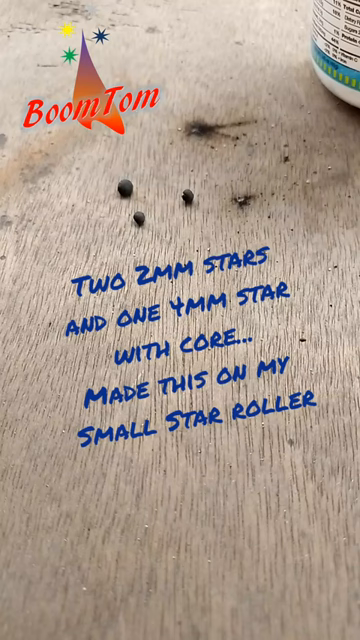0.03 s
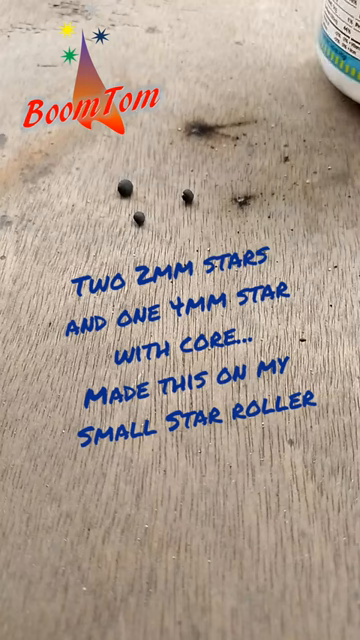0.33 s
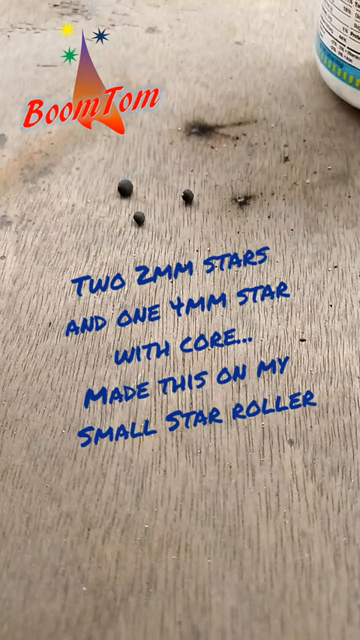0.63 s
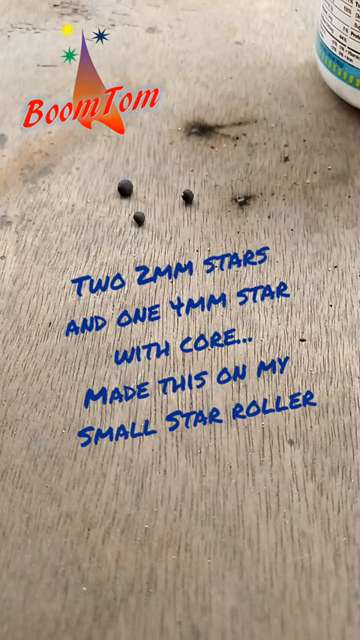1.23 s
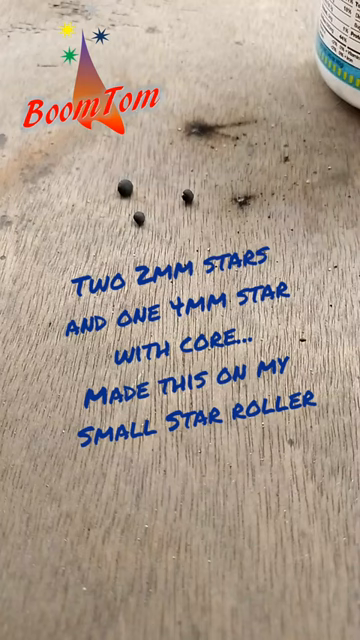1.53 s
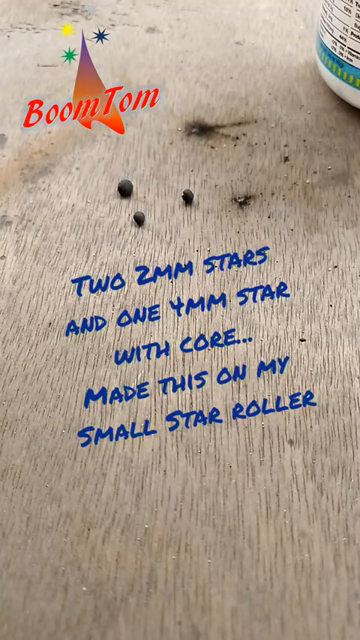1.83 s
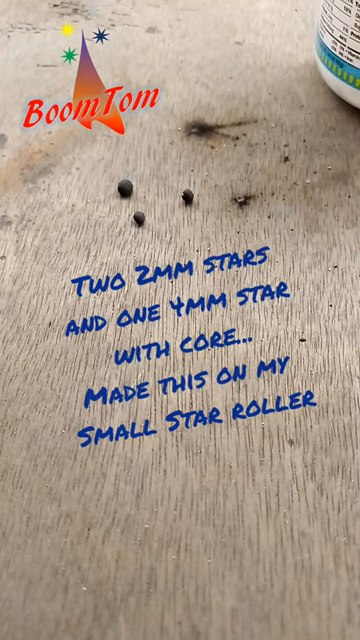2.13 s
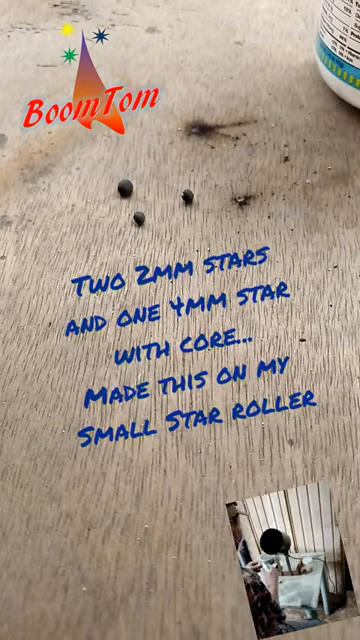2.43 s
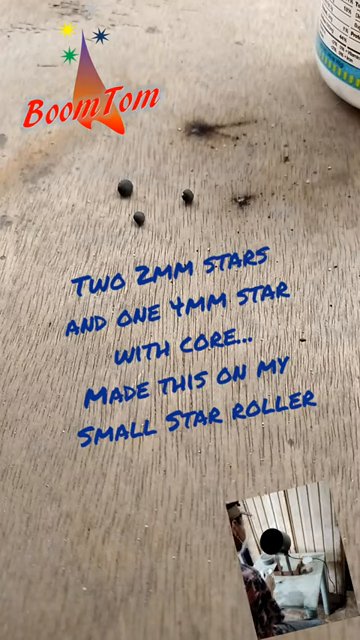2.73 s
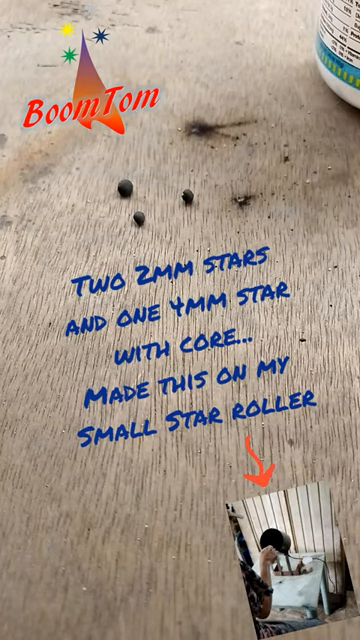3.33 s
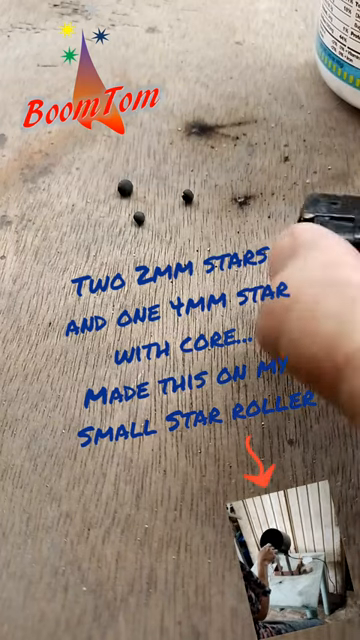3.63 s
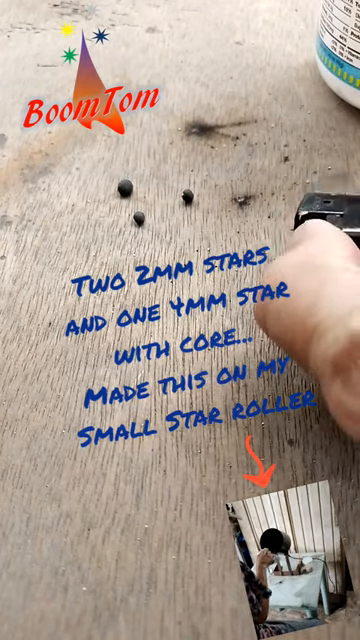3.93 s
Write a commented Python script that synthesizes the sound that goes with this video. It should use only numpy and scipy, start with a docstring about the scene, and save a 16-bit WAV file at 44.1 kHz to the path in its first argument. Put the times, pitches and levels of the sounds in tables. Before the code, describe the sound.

A lighter clicks once, sharp and close, at the very end. Before it, something hollow wobbles softly to rest, a sleeve brushes past on the left and the lighter ticks faintly under a thumb in a quiet room.

```python
"""A quiet room, close to a wooden bench, with faint hiss and rumble. First something hollow wobbles to rest,
each soft bump driving its low resonance. From about two seconds a sleeve brushes past on the left as a hand
comes in, and the hiss grows. A lighter ticks under the thumb; just before the end its igniter snaps once.
The snap rings each microphone port at its own treble pitch, over the lighter's fainter ringing, and the
room reverberates."""
import sys
import numpy as np
from scipy import signal
from scipy.fft import rfft, irfft
from scipy.io import wavfile
from scipy.ndimage import uniform_filter1d

SR = 44100
rng = np.random.default_rng(int(sys.argv[2]) if len(sys.argv) > 2 else 0)


def to_wav(s):
    """Save 16-bit WAV."""
    ch = np.atleast_2d(s).T  # columns
    pcm = np.round(np.clip(ch, -1, 1) * 32767)  # PCM
    wavfile.write(sys.argv[1], SR, pcm.astype(np.int16))


N = 176400
TIME = np.arange(N) / SR
FREQS = np.fft.rfftfreq(N, 1 / SR)
TOP_HZ, ROOM_T60_S = 14400, 0.28


def undb(db):
    """Amplitude grows tenfold with every 20 dB."""
    return 10 ** (np.asarray(db) / 20)


def pan(db):
    """Level difference gives direction: positive dB is left, and the louder side keeps gain 1."""
    return undb(np.minimum([[db], [-db]], 0))


def noise(spectrum, channels=2):
    """Spectral shaping: independent unit noises whose density follows (Hz, dB) points."""
    hz, db = np.array(spectrum, float).T
    gain = undb(np.interp(np.log(np.maximum(FREQS, 1)), np.log(hz), db))
    y = irfft(rfft(rng.standard_normal((channels, N))) * gain * (FREQS < TOP_HZ + 1000), N)
    return y / y.std()


def resonate(x, hz, width_hz):
    """A second-order resonator passes one band, with gain 1 at its centre."""
    return signal.lfilter(*signal.iirpeak(hz, hz / width_hz, fs=SR), x)


def band(hz, width_hz, channels=1):
    """Two wider resonators in cascade give narrow-band unit noise with steep skirts."""
    y = rng.standard_normal((channels, N))
    for _ in range(2):
        y = resonate(y, hz, 1.5 * width_hz)
    return y / y.std()


def walk(rate_hz):
    """Moving averages turn white noise into a slow fluctuation of unit spread."""
    span = max(int(SR / rate_hz), 1)
    y = uniform_filter1d(uniform_filter1d(rng.standard_normal(N), span), span)
    return y / y.std()


def fade(start, t60, hold=0):
    """Exponential decay, 60 dB in t60 seconds, after a sudden onset and an optional hold."""
    age = TIME - start
    return (age >= 0) * np.exp(-np.log(1000) * np.maximum(age - hold, 0) / t60)


def rise(start, length_s):
    """A Gaussian onset builds smoothly from 0 to 1."""
    return 1 - np.exp(-(np.maximum(TIME - start, 0) / length_s) ** 2)


def ring(start, hz, t60):
    """Free vibration of one mode is a damped sinusoid."""
    return fade(start, t60) * np.sin(2 * np.pi * hz * (TIME - start))


def linger(envelope, t60):
    """Leaky integration lets an envelope die away slowly; its peak height is kept."""
    retained = np.exp(-np.log(1000) / (t60 * SR))
    y = signal.lfilter([1 - retained], [1, -retained], envelope)
    return y * envelope.max() / y.max()


def nearby(x):
    """Comb filtering: reflections from the bench and what stands on it interfere with the direct sound."""
    # Each row: delay to the left port in seconds, delay to the right port in seconds, gain in dB.
    surfaces = [(.0022, .0014, -9), (.0053, .0061, -9), (.0097, .0083, -15)]
    response = 1 + sum(undb(db) * np.exp(-2j * np.pi * FREQS * np.array([[left], [right]]))
                       for left, right, db in surfaces)
    return irfft(rfft(x) * response / np.sqrt(np.mean(np.abs(response) ** 2)), N)


def ports(x):
    """Resonance in each microphone port lifts its own treble band."""
    # Left port, then right. Each row: centre in Hz, bandwidth in Hz, lift in dB.
    resonances = [(7585, 956, 13.5), (10130, 1140, 13.5)]
    return np.array([side + (undb(db) - 1) * resonate(side, hz, width_hz)
                     for side, (hz, width_hz, db) in zip(x, resonances)])


def hiss():
    """Broadband noise sinks, then slowly grows; a treble shelf makes it duller on the left."""
    # Each row: time in seconds, level in dB.
    levels = [(.04, -64), (.17, -69.5), (.8, -71), (1.2, -70), (1.7, -69), (2.38, -68), (2.45, -65),
              (3.3, -62.5), (3.6, -64), (4, -59.5)]
    # Each row: frequency in Hz, relative density in dB.
    spectrum = [(150, -14), (400, 7.5), (800, 1.5), (1100, -1), (2000, 1.5), (3200, 1), (6000, -1.5),
                (8000, 1.5), (11000, -2), (14500, -6)]
    broadband = undb(np.interp(TIME, *np.array(levels).T)) * noise(spectrum)
    treble = signal.sosfiltfilt(signal.butter(4, 8900, "high", fs=SR, output="sos"), broadband)
    return broadband + (pan(-3.5) - 1) * treble


def low_room_noise():
    """Coherent noise, alike on both sides: a deep rumble under a wavering murmur."""
    # Each row: time in seconds, level in dB.
    rumble_levels = [(.1, -78), (.7, -84.5), (2.3, -84.5), (2.6, -88.5), (3.2, -83), (4, -85)]
    # Each row of both spectra: frequency in Hz, relative density in dB.
    rumble_spectrum = [(20, -15), (65, 7.5), (110, 3), (160, -13), (300, -32)]
    murmur_spectrum = [(20, -34), (160, -23.5), (240, -6.5), (330, -6), (450, -6.5), (620, -17),
                       (1000, -19), (2000, -40)]
    rumble = undb(np.interp(TIME, *np.array(rumble_levels).T)) * noise(rumble_spectrum, channels=1)
    murmur = undb(-76.5 + 0.9 * walk(14)) * noise(murmur_spectrum, channels=1)
    return rumble + murmur


def faint_resonances():
    """Narrow-band noise is heard as pitch: two soft swells, then a steady drone."""
    # Each row: centre in seconds, half-width in seconds, level in dB.
    swells = [(1.384, 0.12, -80), (1.688, 0.062, -77)]
    envelope = sum(undb(db) * np.exp(-((TIME - s) / half_width) ** 2) for s, half_width, db in swells)
    hum = envelope * band(540, width_hz=35)
    drone = undb(-78) * band(472, width_hz=20) + undb(-79) * band(2378, width_hz=100)
    return hum + rise(start=2.42, length_s=0.0073) * drone


def wobble():
    """Damped resonance: pushes, closer and weaker at the end, swell a hollow body's tone and scuff."""
    # Each row: time of the strongest push in seconds, level in dB.
    bumps = [(0.036, -48), (.071, -58), (0.115, -38.5), (0.228, -40), (0.314, -38.5), (0.389, -41.5),
             (.452, -53.5), (0.501, -56.5), (0.565, -62)]
    # Each row: frequency in Hz, relative density in dB.
    scuff_spectrum = [(40, -30), (85, -12), (118, 3.5), (160, -12), (250, 3), (420, -7.5), (700, -12),
                      (1200, -22), (3000, -21.5), (14000, -38)]
    hollow_hz, push_s, right_lag_s = 308.4, 0.009, 0.00048
    push = sum(undb(db) * np.exp(-((TIME - s) / push_s) ** 2 / 2) for s, db in bumps)
    phase = 2 * np.pi * hollow_hz * (TIME - np.array([[0], [right_lag_s]]))
    roughness = 0.66 * walk(45)
    tone = linger(push, t60=0.094) * np.sin(phase + roughness)
    room = undb(-15) * linger(push, ROOM_T60_S) * band(hollow_hz, width_hz=69, channels=2)
    scuff = undb(-21) * push * noise(scuff_spectrum)
    return pan(-6) * (tone + room) + scuff


def sleeve():
    """Friction noise swells and dies with each stroke, grainy with slipping fibres."""
    # Each row: centre in seconds, duration in seconds, level in dB.
    strokes = [(1.914, 0.039, -61), (2.219, 0.043, -68.5), (2.35, 0.044, -64), (2.718, 0.038, -60),
               (3.023, 0.024, -57.5), (3.054, 0.024, -55), (3.22, 0.13, -74), (3.324, 0.036, -53.5),
               (3.347, 0.0065, -52.5), (3.396, 0.048, -43.5), (3.465, 0.1, -62)]
    # Each row: frequency in Hz, relative density in dB.
    cloth_spectrum = [(200, -24), (1000, -21), (2300, -9), (2900, -10), (3400, -1), (5000, 1), (7500, 4.5),
                      (10000, 5), (12000, 1.5), (14500, -5.5)]
    steepness = 6.4
    speed = sum(undb(db) / np.sqrt(1 + np.abs(2 * (TIME - s) / length) ** steepness)
                for s, length, db in strokes)
    grain = undb(1.3 * walk(510))
    return pan(7.5) * speed * grain * nearby(noise(cloth_spectrum))


def ticks():
    """Light impacts make brief noise bursts: the hollow body and lighter tick, and its case knocks once."""
    # Each row of both tables: start in seconds, level in dB.
    hollow_contacts = [(.226, -63), (0.321, -63)]
    thumb_ticks = [(3.603, -54), (3.642, -51.5), (3.6455, -56), (3.680, -51.5), (3.699, -55), (3.7145, -52),
                   (3.721, -55), (3.729, -49.5), (3.747, -50.5), (3.7685, -55.5)]
    # Each row: frequency in Hz, relative density in dB.
    spectrum = [(200, -22), (1500, -10), (3000, -16), (7000, 5), (12000, 2), (14500, -8)]
    clicks = sum(undb(db) * fade(s, t60=0.013) for s, db in hollow_contacts + thumb_ticks) * noise(spectrum)
    knock = undb(-55) * fade(3.716, t60=0.03) * band(1750, width_hz=1100, channels=2)
    return clicks + knock


def reverberation(start):
    """The room's diffuse field decays exponentially after the snap, fuller once the walls reply."""
    # Each row: frequency in Hz, relative density in dB.
    spectrum = [(60, -7), (170, -3.5), (310, 15.5), (480, -6), (800, -23), (1500, -10), (2100, 1.5),
                (2900, -3.5), (4000, -6.5), (5100, 6), (5800, 3), (7000, 9), (9000, 5.5), (12000, 8.5),
                (14500, -8)]
    early = rise(start, 0.002) * fade(start, ROOM_T60_S)
    reflected = undb(-8) * fade(start + 0.024, ROOM_T60_S)
    envelope = np.hypot(early, reflected)  # incoherent sounds add in power
    grainy_gain = undb(-31 + 1.5 * walk(500))
    return grainy_gain * pan(-1.5) * envelope * nearby(noise(spectrum))


def igniter(start):
    """Impulse excitation: a click, crack and case thump; the ports ring, and more faintly the lighter."""
    # The two loudest modes are the microphone ports, left then right.
    # Each row: frequency in Hz, time to decay by 60 dB in seconds, left level in dB, right level in dB.
    modes = [(7380, 0.01, 2.5, -27), (10460, 0.0069, -13, 4), (7650, 0.069, -16.5, -29),
             (5040, .012, -19, -28), (2924, 0.012, -31, -24), (13100, 0.0084, -25, -9.5),
             (2930, .3, -54, -54), (4920, 0.27, -50, -56), (5604, 0.17, -48, -45), (7850, 0.25, -49, -49),
             (8974, 0.27, -39, -35), (9889, 0.21, -52, -32), (11150, .2, -49, -40)]
    # Each row: frequency in Hz, relative density in dB.
    crack_spectrum = [(100, -8), (600, -23), (1500, -9), (2800, 0), (4000, -1), (5100, 1), (6500, 10),
                      (8000, 2), (13500, -4), (15500, -6)]
    pulse_s = 0.00009
    pulse = undb(-15.5) * pan(-6.5) * np.exp(-((TIME - start) / pulse_s) ** 2)
    click = signal.sosfilt(signal.butter(2, 545, "high", fs=SR, output="sos"), pulse)
    crack = undb(-18.5) * fade(start, t60=0.014, hold=0.0013) * noise(crack_spectrum)
    thump = undb(-23) * pan(-41) * ring(start, hz=312, t60=0.026)
    ringing = sum(undb([[left], [right]]) * ring(start, hz, t60) for hz, t60, left, right in modes)
    return click + crack + thump + rise(start, 0.00061) * ringing


def scene():
    """Superposition: all sources add at the two microphone ports."""
    snap_s = 3.8435
    background = hiss() + low_room_noise() + faint_resonances()
    handling = wobble() + sleeve() + ticks()
    return ports(background + handling) + igniter(snap_s) + ports(reverberation(snap_s))


def record(dry):
    """Soft saturation rounds the loudest peak; the sound fades in quickly and a low-pass cuts the top."""
    rounded = np.tanh(dry) * rise(start=0.036, length_s=0.00067)
    return signal.sosfilt(signal.ellip(8, .2, 70, TOP_HZ, fs=SR, output="sos"), rounded)


dry = scene()
out = record(dry)
to_wav(out)
```